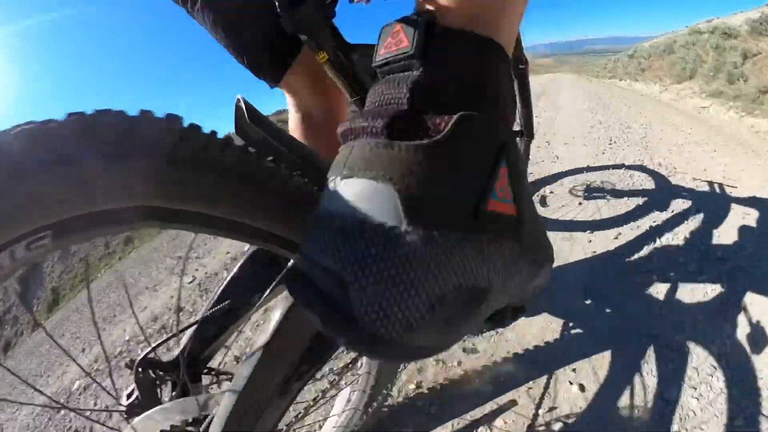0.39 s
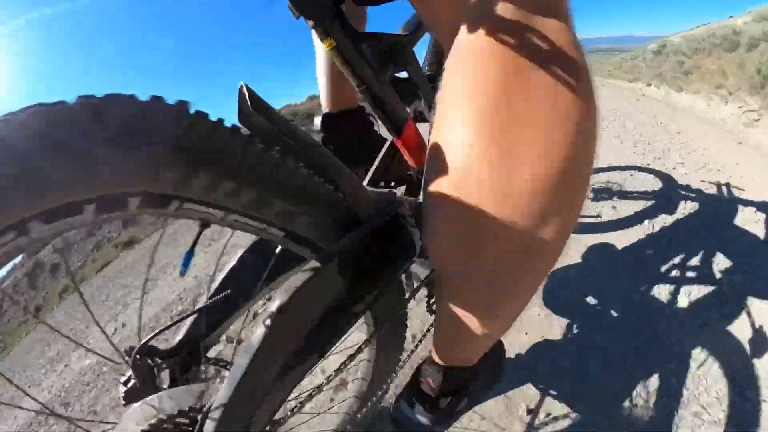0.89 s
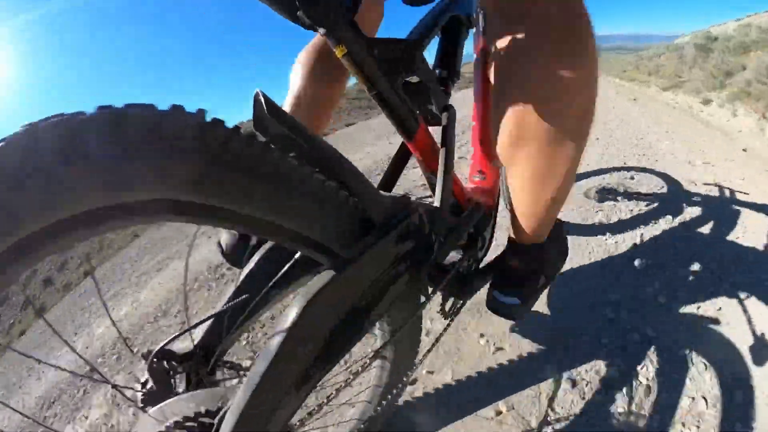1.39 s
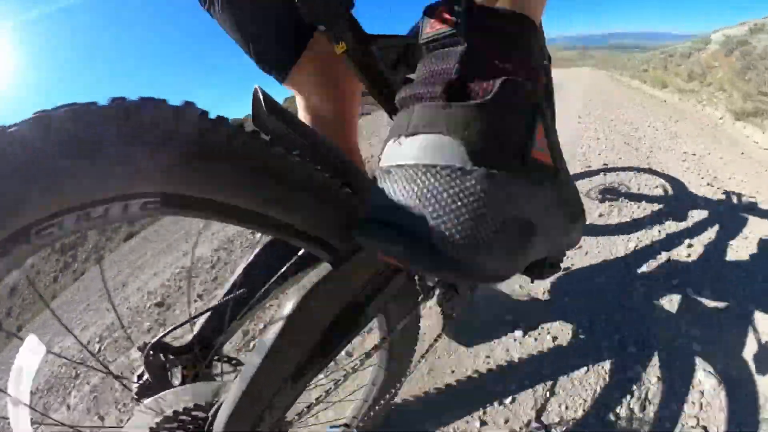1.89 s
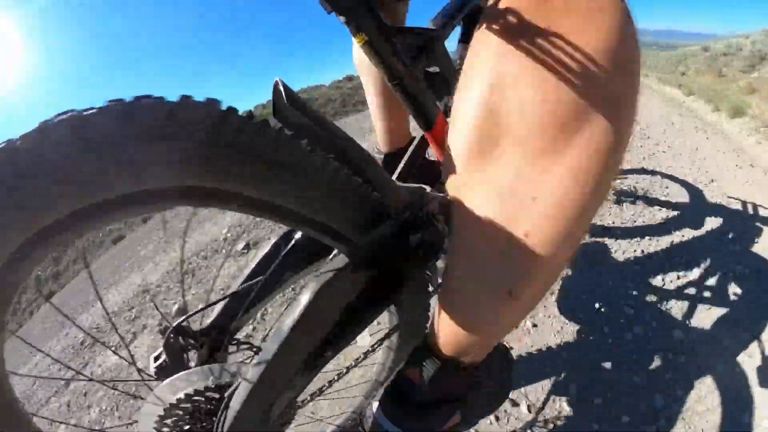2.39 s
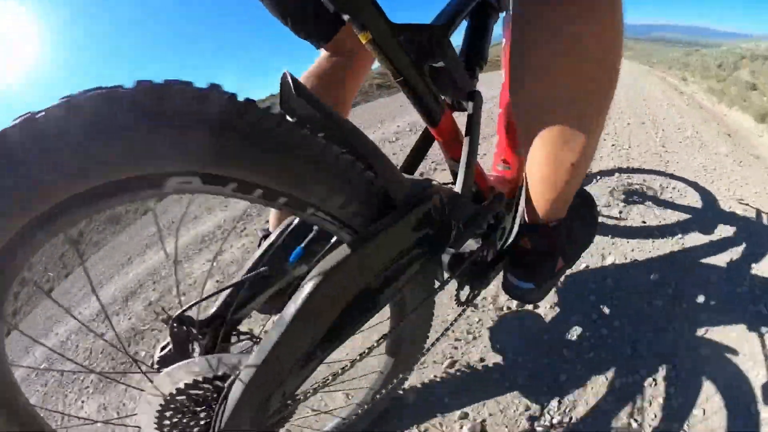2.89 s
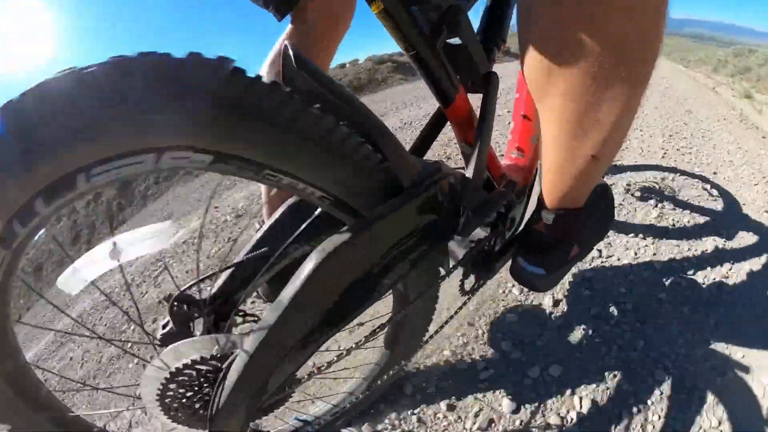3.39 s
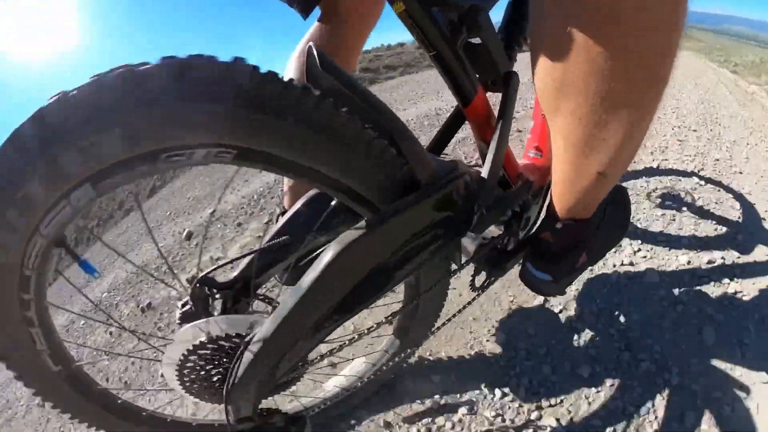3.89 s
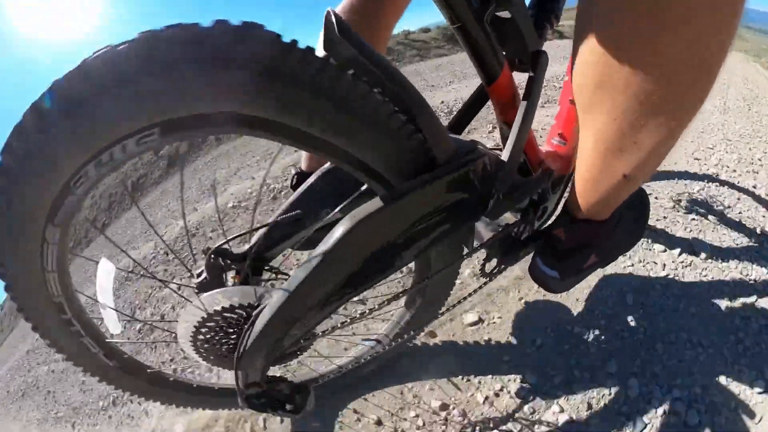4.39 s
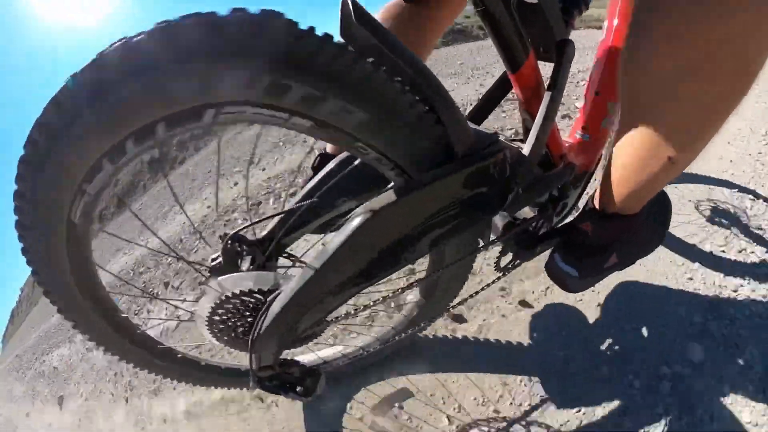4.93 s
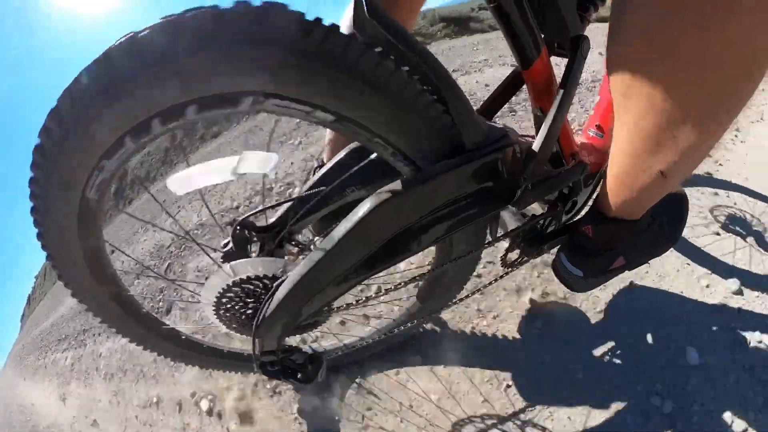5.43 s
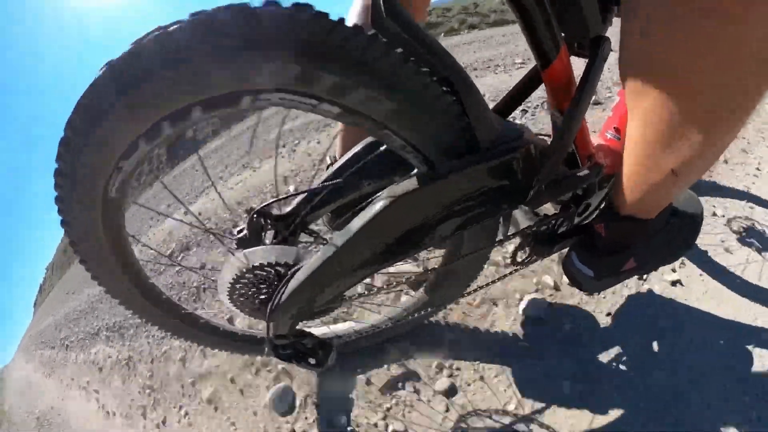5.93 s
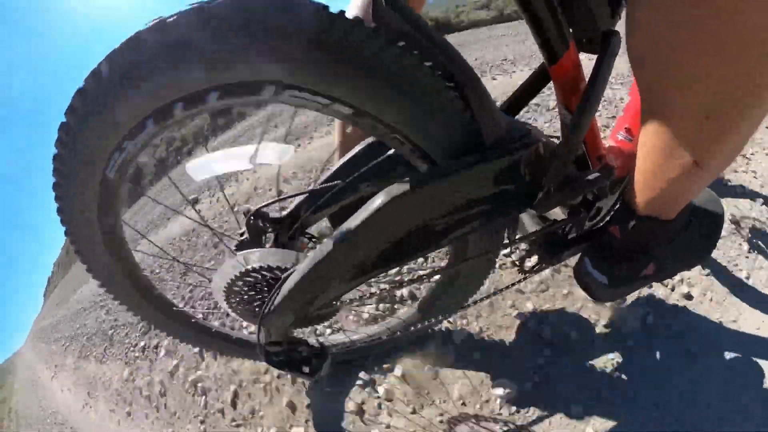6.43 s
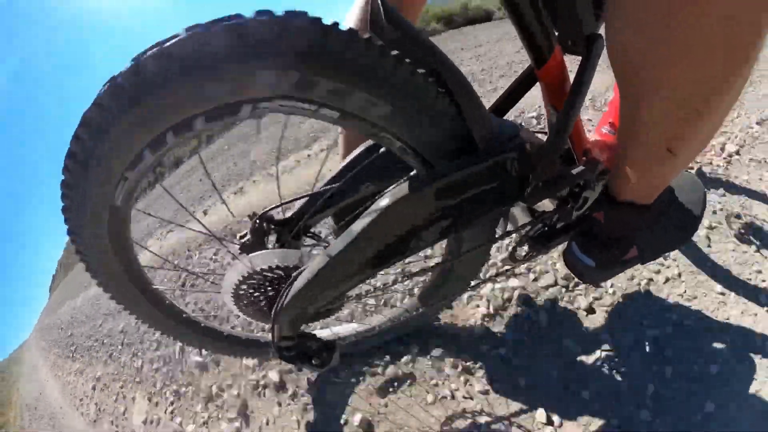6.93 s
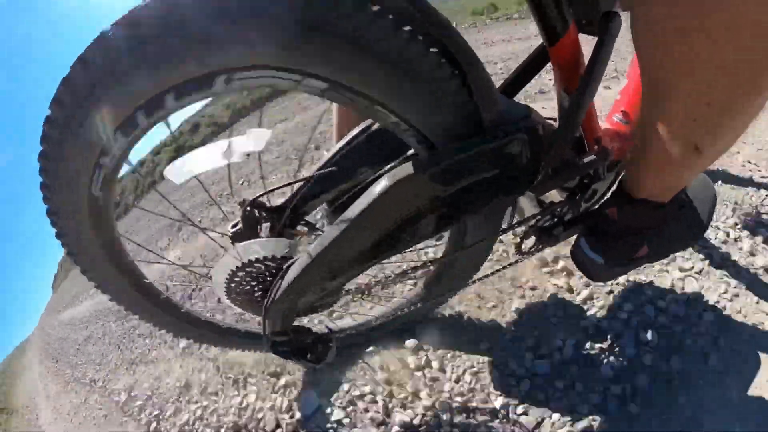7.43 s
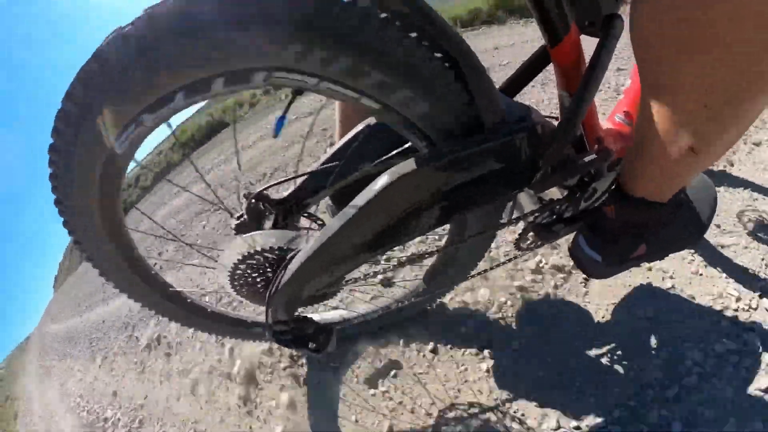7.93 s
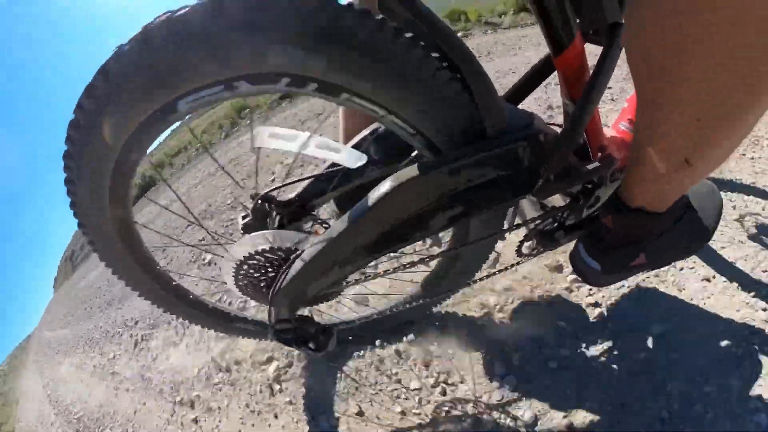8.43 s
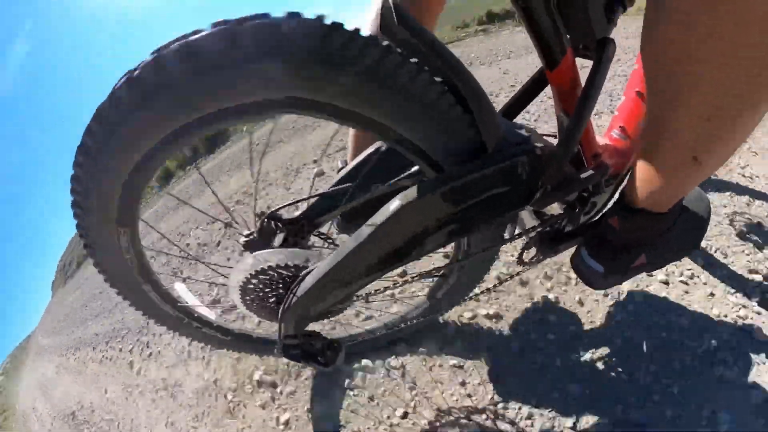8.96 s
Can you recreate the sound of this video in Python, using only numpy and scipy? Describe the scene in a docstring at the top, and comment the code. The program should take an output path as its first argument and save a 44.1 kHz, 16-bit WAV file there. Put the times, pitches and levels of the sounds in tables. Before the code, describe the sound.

A microphone mounted low beside a bicycle's rear wheel outdoors is battered by deep, fluttering wind. Wide knobby tyres thrum over gravel with brief crunches and scattered dull stone knocks. After nearly three seconds pedalling stops and a faint, fast ratchet buzz joins. The gravel then grows coarser and louder, with bright stone clicks and hard knocks crowding around seven seconds.

```python
"""Wind buffets a microphone riding low on a bicycle over a gravel road: low noise, with a fluttering edge.
The wide knobby tyre thrums and crushes gravel: coloured noise bursts and small damped sines.
Loose stones click (short noise cracks) and knock (a few dull cycles).
When the rider stops pedalling the freewheel ratchet buzzes: one noise tick per tooth rings the hub shell."""
import sys
import numpy as np
from scipy import signal
from scipy.fft import rfft, irfft, next_fast_len
from scipy.io import wavfile
from scipy.ndimage import uniform_filter1d, map_coordinates

SR = 44100
rng = np.random.default_rng(int(sys.argv[2]) if len(sys.argv) > 2 else 0)


def makeup_ratio(level_db):
    """Linear amplitude ratio for a level in decibels (20 dB per factor of ten)."""
    decades = np.asarray(level_db, float) / 20
    return 10 ** decades


def to_wav(sig):
    """Store sig (one row per channel, or 1-D mono) as 16-bit WAV at the path in sys.argv[1].

    Samples outside -1..1 are clipped; the rate is SR.
    """
    pcm = np.clip(np.atleast_2d(sig), -1, 1) * 32767
    pcm = np.round(pcm).astype(np.int16)
    wavfile.write(sys.argv[1], SR, pcm.T)  # frames by channels


N = 399987


def unit(x):
    """Scaled to rms 1."""
    return x / np.sqrt(np.mean(x ** 2) + 1e-20)


def curves(rows):
    """One value per sample for each column after the time."""
    time_s, *columns = np.transpose(rows)
    return [np.interp(np.arange(N) / SR, time_s, column) for column in columns]


def swells(rows):
    """Sum in dB of bell-shaped rises; length is the full width at 1/e."""
    t = np.arange(0, N, 50) / SR
    rise_db = sum(db * np.exp(-(2 * (t - middle_s) / length_s) ** 2) for middle_s, length_s, db in rows)
    return np.interp(np.arange(N) / SR, t, rise_db)


def wobble(knots_per_s):
    """A smooth random curve."""
    knots = rng.standard_normal(N // 100)
    return map_coordinates(knots, [np.arange(N) * knots_per_s / SR])


def filtered(x, response):
    """x times a response of frequency in Hz."""
    size = next_fast_len(N + 8192)
    hz = np.fft.rfftfreq(size, 1 / SR)
    return irfft(rfft(x, size) * response(hz), size)[:N]


def coloured(x, spectrum):
    """x through a (frequency [Hz], gain [dB]) curve, scaled to rms 1."""
    knot_hz, gain_db = np.transpose(spectrum)

    def response(hz):
        return makeup_ratio(np.interp(np.log(hz + 1), np.log(knot_hz + 1), gain_db, -120, -120))

    return unit(filtered(x, response))


def crushed(per_s, spread_db, life_s, smooth):
    """Decaying noise bursts of uneven size at random times, over a smooth hiss."""
    starts = rng.random(N) < per_s / SR
    sizes = starts * makeup_ratio(spread_db * np.minimum(rng.exponential(size=N), 4))
    t = np.arange(SR // 20) / SR
    bursts = signal.fftconvolve(sizes, np.exp(-t / life_s))[:N]
    return (smooth + unit(bursts)) * rng.standard_normal(N)


# wind: (time [s], push of the eddies [dB], their sharpness at the port edge [dB])
WIND = [(0, -17, -43), (.8, -16, -43), (1.2, -16.5, -41), (2.2, -15.5, -36.5), (3.3, -17, -45),
        (4.6, -18, -49.5), (5.3, -18.5, -39), (6.1, -16.5, -47), (6.4, -22.5, -41), (6.7, -17, -46),
        (7.75, -17, -43), (8.05, -22, -64), (8.6, -17, -53), (9.07, -18, -44)]
# low push filter: (frequency [Hz], gain [dB])
BUFFET = [(12, -38), (20, 0), (48, 2), (68, 1.5), (124, -3), (151, -9.5), (170, -17.5), (220, -46.5),
          (370, -120)]
# port edge filter: (frequency [Hz], gain [dB])
FLUTTER = [(200, -16), (330, 4.5), (450, 1.5), (650, -5.5), (1000, -36.5)]
# tyre jolted or, below zero, unloaded; also plays in tyre(): (middle [s], length [s], rise [dB])
BUMPS = [(.2, 0.1, 9), (.71, 0.055, 3), (.93, 0.14, 5.5), (1.18, 0.048, 1), (1.48, 0.04, -9),
         (1.81, 0.1, -6), (2.62, 0.087, -3.5), (3.45, 0.12, 8), (3.85, 0.087, 3), (4.94, 0.042, -16),
         (5.3, 0.1, 7), (5.5, 0.29, 5.5), (6.2, 0.11, 1.5), (6.68, 0.2, 4.5), (7.1, 0.61, 7.5),
         (7.71, 0.071, 3.5), (7.88, 0.031, 4.5), (7.99, 0.051, 4.5), (8.62, 0.37, 5.5), (8.99, 0.028, 6)]
# loose heaps or, below zero, bare ground; also plays in tyre(): (middle [s], length [s], rise [dB])
HEAPS = [(.12, 0.018, 3), (.44, 0.02, 9.5), (.56, 0.19, 6), (.92, 0.05, 2), (1.04, 0.047, 0.5),
         (1.19, 0.035, 5), (1.29, 0.19, 7.5), (1.76, 0.024, -1), (1.97, 0.033, 4), (2.05, 0.018, 2.5),
         (2.265, 0.032, 10.5), (2.31, 0.022, 2), (2.615, 0.067, 8.5), (2.7, 0.031, -4.5), (2.75, 0.066, 3),
         (4.81, 0.12, 4), (4.95, 0.014, 7.5), (5.04, 0.016, 4.5), (5.15, 0.14, 0.5), (5.49, 0.047, 1.5),
         (5.74, 0.04, 1.5), (6.05, 0.28, 2.5), (6.22, .04, 2), (6.73, 0.14, 1.5), (6.83, 0.037, -4),
         (7.11, 0.033, 6), (7.2, 0.04, 4), (7.45, 0.033, 0), (7.57, 0.03, -4), (7.68, 0.052, 3),
         (8.29, 0.065, 6.5), (8.5, 0.067, 2.5), (8.63, 0.31, 4), (9, 0.074, 5)]


def wind(shake):
    """Eddies push on the microphone port and flutter its edge, both moved by the shaking bicycle."""
    push_db, edge_db = curves(WIND)
    push_db = push_db + 2.03 * wobble(7) + 1.3 * shake
    buffet = makeup_ratio(push_db) * coloured(rng.standard_normal(N), BUFFET)
    flutter = crushed(90, spread_db=-2.0, life_s=0.0032, smooth=0.45)
    flutter = makeup_ratio(0.78 * wobble(22) + 1.3 * shake) * flutter
    edge_db = edge_db + 0.53 * swells(BUMPS) + 1.3 * swells(HEAPS)
    return buffet + makeup_ratio(edge_db) * coloured(flutter, FLUTTER)


def chips(per_s, centre_hz, spread, cycles, spread_db):
    """Tiny stones pinging: damped sines of scattered pitch (+-spread, log units) and size."""
    when, pitch, size = rng.random((3, 12000))[:, :int(per_s * N / SR)]
    hz = centre_hz * np.exp(spread * (2 * pitch - 1))[:, None]
    t = np.arange(600) / SR
    level = makeup_ratio(-spread_db * np.log(size + 0.059))[:, None]
    pings = level * np.sin(2 * np.pi * hz * t) * np.exp(-t * hz / cycles)
    at = (when * N).astype(int)[:, None] + np.arange(len(t))
    return unit(np.bincount(at.ravel(), pings.ravel(), N)[:N])


# ground under the tread; also shakes freewheel():
# (time [s], coarse stones [dB], fine grit [dB], ruts that thrum the carcass [dB])
ROAD = [(0, -35, -50, -28.5), (.33, -44.5, -60, -30.5), (.75, -45, -60.5, -29.5), (1.1, -43.5, -57.5, -27),
        (1.5, -46.5, -56.5, -27), (1.9, -46, -60.5, -26), (2.45, -42.5, -60, -30.5),
        (2.61, -41.5, -56.5, -27.5), (2.67, -41, -57, -25.5), (2.9, -37, -54, -26.5),
        (3.4, -39, -52.5, -31), (4.3, -39.5, -49.5, -24.5), (4.86, -45, -52.5, -30.5),
        (4.96, -36, -50, -28.5), (6, -37, -48.5, -24), (6.4, -37, -49, -24.5), (7, -34.5, -45.5, -27),
        (7.7, -34.5, -51, -21.5), (8.1, -36, -48.5, -24.5), (8.6, -36, -49, -25), (9.07, -35, -50, -20)]
# carcass filter: (frequency [Hz], gain [dB])
THRUM = [(70, -51), (120, -4.5), (170, -2), (215, -3.5), (250, -4.5), (280, -7), (315, -11), (400, -20),
         (550, -25.5), (900, -29), (1400, -49)]
# coarse stone filter: (frequency [Hz], gain [dB])
CRUNCH = [(250, -28), (450, -3.5), (800, -7), (1250, 1.5), (1500, -4.5), (1850, -6), (2300, -14),
          (3000, -21), (5000, -44.5)]
# fine grit filter: (frequency [Hz], gain [dB])
GRIT = [(1500, -6), (2500, -4.5), (3500, -4), (5000, -5.5), (7200, -13), (8300, -17.5), (10000, -24.5),
        (12200, -31.5), (13000, -39), (14500, -55), (16000, -83.5)]


def tyre(shake):
    """The carcass thrums, coarse stones crunch dully, fine grit crackles; all swell as the tread bites."""
    coarse_db, fine_db, ruts_db = curves(ROAD)
    heaps_db = swells(HEAPS)
    thrum_db = ruts_db + swells(BUMPS) + 0.76 * heaps_db
    crunch_db = coarse_db + heaps_db
    grit_db = fine_db + 0.66 * heaps_db + 1.2 * wobble(18)

    bite = wobble(18)
    thrum = makeup_ratio(0.8 * bite + 1.1 * shake) * crushed(160, spread_db=3.5, life_s=0.0064, smooth=1.21)
    crunch = makeup_ratio(1.1 * bite + 0.54 * shake) * crushed(260, spread_db=4.5, life_s=0.0063, smooth=2.8)
    grit = makeup_ratio(0.24 * bite) * crushed(530, spread_db=0.5, life_s=0.00086, smooth=4.1)
    thrum, crunch, grit = unit(thrum), unit(crunch), unit(grit)

    pings = chips(500, 4220, spread=1.17, cycles=3.4, spread_db=0.0)
    pings = filtered(pings, lambda hz: np.sqrt(hz / 4000))  # high pings are short, so lift them level
    pops = chips(420, 1177, spread=0.63, cycles=1.4, spread_db=2.5)  # bigger stones popping from under the knobs
    rings = chips(84, 4200, spread=0.9, cycles=47, spread_db=1.5)  # hard flints that ring longer

    carcass = coloured(thrum + 0.27 * crunch, THRUM)
    coarse = coloured(crunch + 0.4 * pings + 0.37 * pops, CRUNCH)
    fine = coloured(grit + 1.4 * crunch + 0.75 * pings + 0.49 * rings, GRIT)
    return makeup_ratio(thrum_db) * carcass + makeup_ratio(crunch_db) * coarse + makeup_ratio(grit_db) * fine


def click(hz, edge_db, t):
    """Stone on stone: a noise crack round a pitch, with a bright edge that fades a little slower."""
    def band(noise, lo_hz, hi_hz):
        sos = signal.butter(4, [lo_hz, hi_hz], "bandpass", fs=SR, output="sos")
        return unit(signal.sosfilt(sos, noise))

    body_noise, edge_noise = rng.standard_normal((2, len(t)))
    body = band(body_noise, hz * 0.67, hz * 1.22) * makeup_ratio(-60 * t / 0.016)
    edge = band(edge_noise, 5000, 7440) * makeup_ratio(-60 * t / 0.021)
    return body + makeup_ratio(edge_db + 8.0) * edge


# tyre wall modes, answering every knock: (frequency [Hz], level re thud [dB], decay to 1/e [s])
CASING = [(640, -10, 0.0018), (1250, -17.5, 0.0019)]


def knock(hz, snap_db, t):
    """Stone under the tyre: a few dull cycles that ring on faintly, the casing's answer and a snap."""
    decay = np.exp(-t * hz / 0.72) + 0.2 * np.exp(-t * hz / 1.9)
    thud = np.sin(2 * np.pi * hz * t) * decay
    casing = sum(makeup_ratio(db) * np.sin(2 * np.pi * mode_hz * t) * np.exp(-t / life_s)
                 for mode_hz, db, life_s in CASING)
    snap = makeup_ratio(snap_db + 4.0) * np.sin(2 * np.pi * 2100 * t) * np.exp(-t / 0.0007)
    return thud + casing + snap


# stone on stone: (time [s], relative level [dB], pitch [Hz], relative bright edge [dB])
CLICKS = [(0.1135, -43, 3590, -20), (0.3003, -46, 2700, -33), (0.3836, -73, 3520, 8),
          (0.4146, -51, 4240, -3.5), (0.4457, -46, 3430, -11), (0.5334, -49, 4000, -11),
          (0.558, -38, 3400, -37), (0.5768, -40, 3340, -28), (0.8355, -47, 4060, -27),
          (1.3146, -38, 4780, -18), (1.952, -45, 3600, -22), (2.0384, -41, 2900, -28),
          (2.553, -39, 3320, -26), (2.607, -33, 4200, -14), (2.619, -43, 4900, -24), (4.67, -39, 4330, -23),
          (4.9236, -42, 4190, -7), (5.3058, -40, 3500, -16.5), (5.4884, -29, 2700, -23),
          (5.624, -39, 5140, -11), (5.7108, -36, 3440, -15), (5.7438, -33, 4300, -17),
          (5.7724, -39, 6060, -20), (5.844, -33, 3940, -32), (5.883, -31, 3900, -10), (5.907, -43, 3640, 1),
          (5.939, -43, 3720, -12), (6.0332, -39, 3620, -6.5), (6.178, -29.5, 4600, -31),
          (6.423, -32, 4330, -18), (6.4512, -36, 3820, -15), (6.493, -33, 4300, -13),
          (6.822, -26, 3300, -26), (6.9204, -31, 3990, -17), (7.048, -38, 8500, -20),
          (7.089, -34, 3300, -14), (7.112, -31, 4060, -10), (7.1209, -17, 3840, -19.5),
          (7.1506, -32, 3320, -14), (7.1938, -22, 4530, -17), (7.241, -44, 3500, -5),
          (7.257, -33, 3970, -12), (7.4893, -41, 5400, -12), (7.496, -32, 4900, -15),
          (7.6766, -32, 4330, -22), (7.804, -33.5, 3330, -8), (7.882, -31, 3830, -17),
          (7.9609, -41, 4300, -10), (8.172, -35.5, 9140, -15), (8.22, -48, 4050, 0),
          (8.5093, -36, 6700, -28), (8.6166, -27.5, 4930, -19), (8.649, -33, 6200, -7),
          (8.9606, -44, 3300, 2)]
# stones under the tyre: (time [s], relative level [dB], pitch [Hz], relative snap [dB])
KNOCKS = [(0.5293, -12, 1300, -11), (0.5615, -13, 1190, -13), (0.6265, -17, 620, -20),
          (0.716, -13, 1310, -38), (1.0357, -15, 1250, -16), (1.043, -13.5, 794, -26),
          (1.095, -19, 860, -18), (1.2752, -10.5, 720, -23), (1.4945, -23, 684, -16), (1.644, -20, 627, -9),
          (1.761, -14, 1040, -33), (1.9605, -21, 790, -21), (1.974, -23, 900, -25), (2.039, -9, 890, -15),
          (2.0466, -12.5, 900, -26), (2.124, -20.5, 665, -8), (2.166, -16, 1700, -27),
          (2.246, -29, 700, -23), (2.2594, -11, 795, -12), (2.833, -15, 1080, -14), (2.961, -11, 1350, -12),
          (3.2136, -25, 1160, -21), (3.5084, -13.5, 1250, -20), (3.842, -21, 705, -11),
          (3.647, -16.5, 680, -11), (3.967, -15, 1170, -9), (4.174, -16, 746, -3), (4.2054, -24, 900, -18),
          (4.5217, -15, 1180, -15), (4.774, -17.5, 645, -11), (4.798, -14.5, 1210, -8),
          (4.9455, -9.5, 1250, -22), (5.04, -12, 1230, -16), (5.392, -14, 1100, -26), (5.4, -21, 616, -22),
          (5.443, -15, 1300, -25), (5.4542, -10, 1190, -17), (5.7493, -10, 1160, -20),
          (5.841, -16, 942, -4), (6.0302, -15, 1400, -20), (6.395, -13, 1160, -12),
          (6.5617, -13, 1150, -13), (6.8224, -4.5, 920, -16), (6.8544, -10, 765, -25),
          (6.885, -21, 1180, -16), (6.911, -8.5, 1050, -20), (7.024, -7.5, 1010, -16),
          (7.0904, -4.5, 1300, -12), (7.112, -10, 1700, -9), (7.1215, -22.5, 1900, -14),
          (7.1974, -5, 960, -24), (7.316, -14, 640, -7), (7.4894, -9, 1130, -26), (7.524, -13, 725, -29),
          (7.576, -11, 1100, -27), (7.676, -9, 1160, -17), (8.2847, -6, 1230, -34), (8.5113, -6, 1030, -27),
          (8.6435, -13, 623, -16), (8.66, -11, 724, -23)]


def stones():
    """Clicks and knocks, each with a soft onset, dulled in the treble by the camera housing."""
    out = np.zeros(N + SR)
    t = np.arange(SR // 20) / SR
    onset = 1 - np.exp(-t / 0.00054)
    for rows, strike in ((CLICKS, click), (KNOCKS, knock)):
        for time_s, db, hz, bright_db in rows:
            hit = strike(hz, bright_db, t) * onset
            out[round(time_s * SR):][:len(t)] += makeup_ratio(db - 1.0) * hit
    return filtered(out[:N], lambda hz: 1 / (1 + (hz / 11500) ** 6))


# ratchet: (time [s], tick rate [1/s])
HUB = [(0, 101), (4.8, 102), (6.6, 98), (8.2, 108), (9.07, 105)]
# hub shell modes: (frequency [Hz], width [Hz], level [dB])
PAWL = [(4300, 470, -1), (5430, 330, -3), (6960, 790, -1.5), (8100, 400, 0), (9420, 1100, -4.5),
        (12100, 620, -5)]


def freewheel():
    """Pawls drop over the ratchet teeth: a soft tick per tooth over a steady scrape rings the hub shell."""
    coast_s, engage_s = 2.7, 0.27  # pedals stop, fade-in
    hub_db, usual_db, shaken = -57, -39, 0.91  # shaken: dB per dB of coarse stones over usual_db
    rate, = curves(HUB)
    coasting = np.clip((np.arange(N) / SR - coast_s) / engage_s, 0, 1)
    level_db = hub_db + shaken * (curves(ROAD)[0] - usual_db)
    since_tooth_s = np.cumsum(rate / SR) % 1 / rate
    tick = np.exp(-since_tooth_s / 0.0042) * makeup_ratio(3.4 * wobble(70))
    ticks = (0.21 + tick) * rng.standard_normal(N)

    def shell(hz):
        total = 0
        for k, (centre, width, db) in enumerate(PAWL):
            damping = 1j * hz * width
            total = total + (-1) ** k * makeup_ratio(db) * damping / (centre ** 2 - hz ** 2 + damping)
        return total * makeup_ratio(-2.6 * hz / 1000)  # the camera housing dulls the treble

    return coasting * makeup_ratio(level_db) * unit(filtered(ticks, shell))


def scene():
    """Everything reaches one microphone."""
    shake = wobble(14)  # the frame trembles unevenly
    return (wind(shake) + tyre(shake) + stones() + freewheel())[None]


def low_pass(x):
    """Removes everything above the highest recorded frequency."""
    return signal.sosfilt(signal.butter(12, 15100, fs=SR, output="sos"), x)


def record(dry):
    """A fast gain control leans on the loudest bass pushes and rounds their peaks; the rest passes."""
    bass = filtered(dry[0], lambda hz: 1 / (1 + (hz / 550) ** 4))
    level = np.sqrt(np.abs(uniform_filter1d(bass ** 2, size=900)))
    held = bass / (0.5 + (level / 0.28) ** 2) ** 0.27
    rounded = held / (1 + np.abs(held / 0.58) ** 4) ** 0.3
    mix = dry - bass + rounded
    return low_pass(mix)


dry = scene()
out = record(dry)
to_wav(out)
```